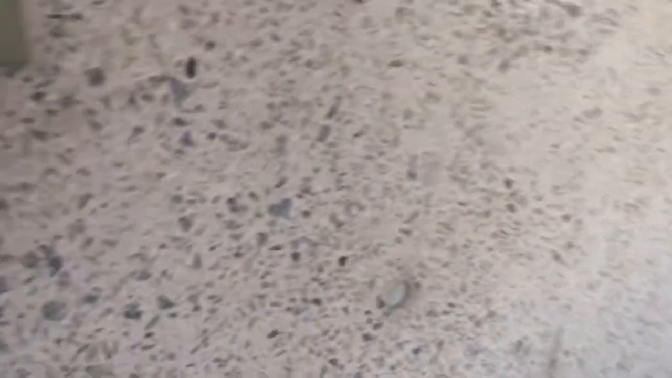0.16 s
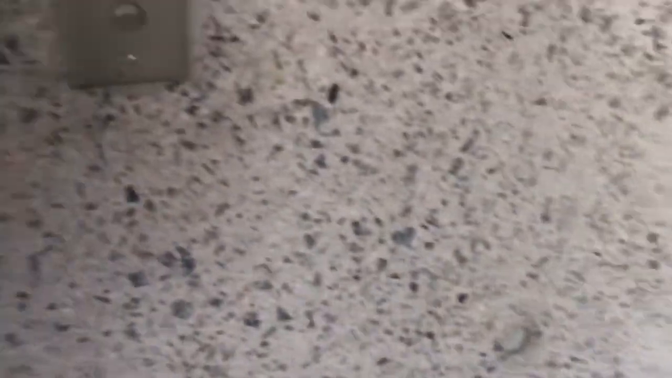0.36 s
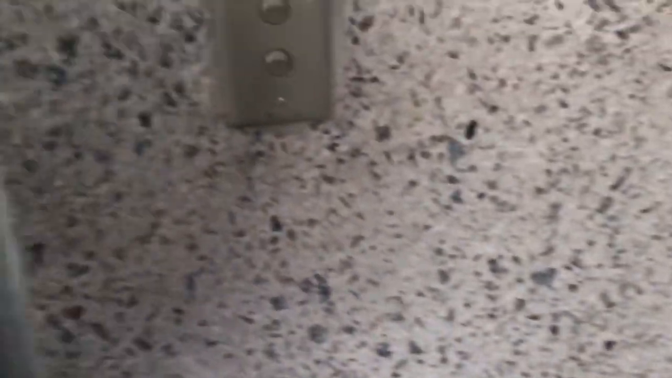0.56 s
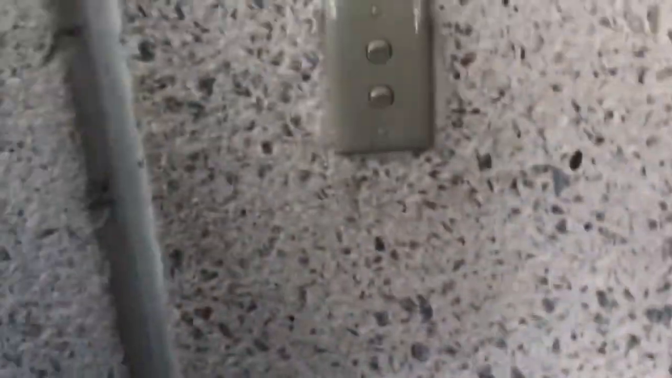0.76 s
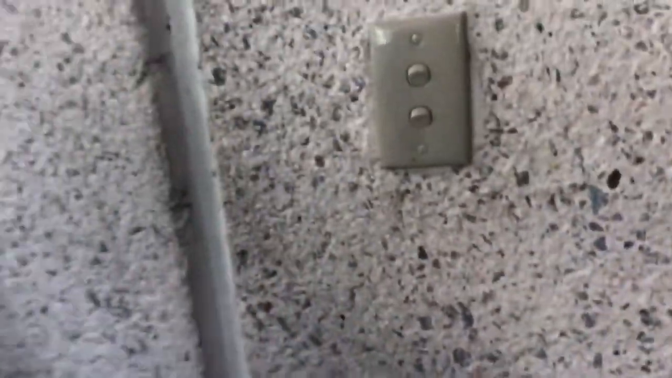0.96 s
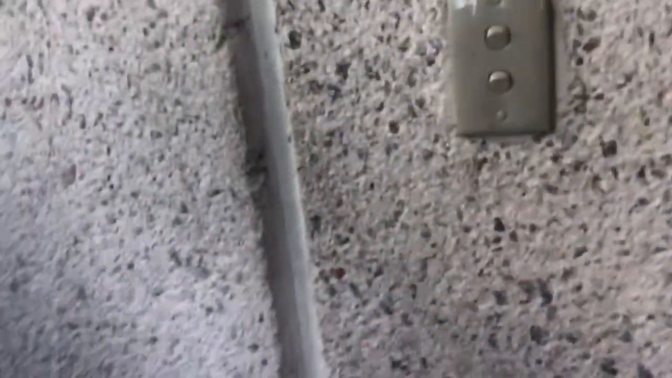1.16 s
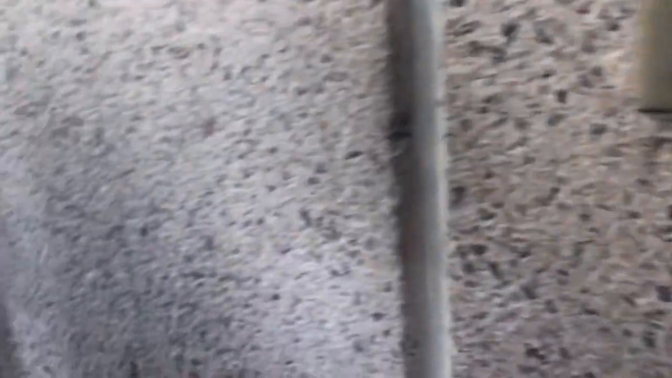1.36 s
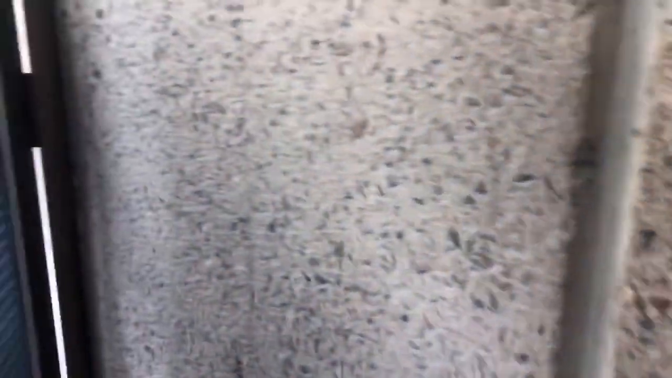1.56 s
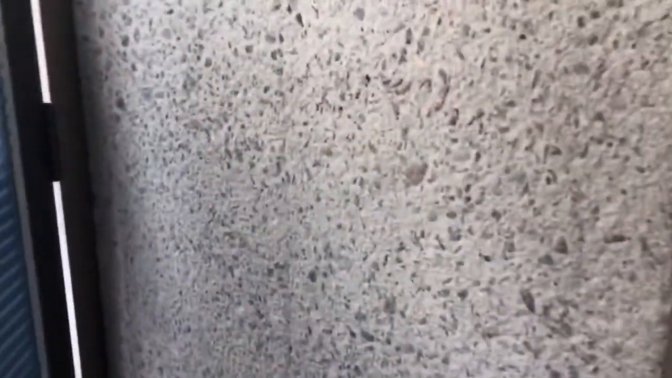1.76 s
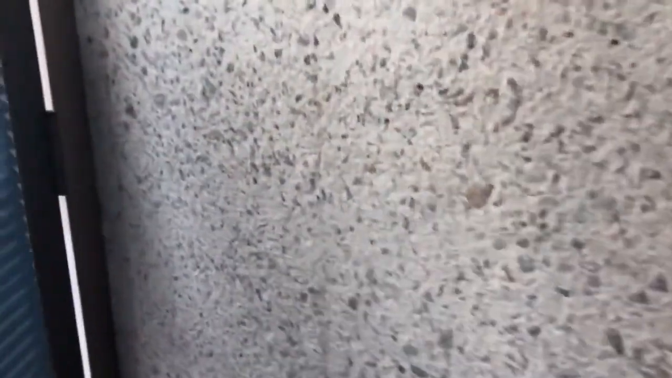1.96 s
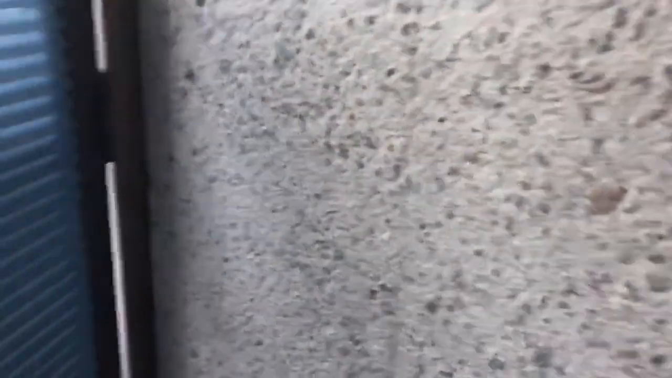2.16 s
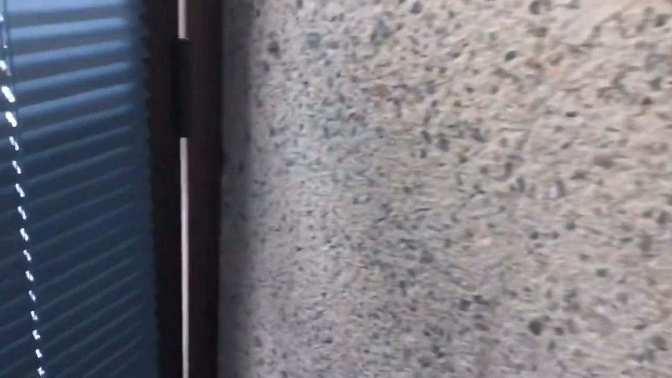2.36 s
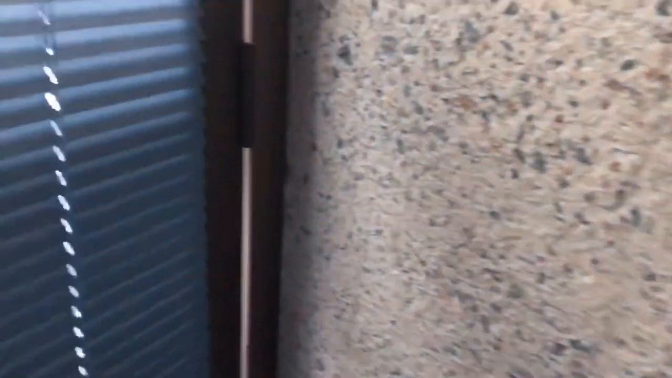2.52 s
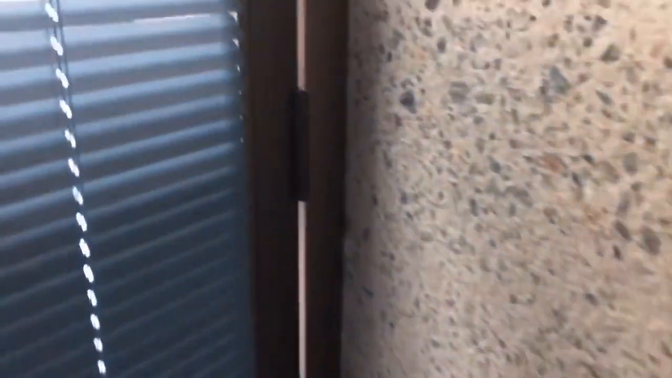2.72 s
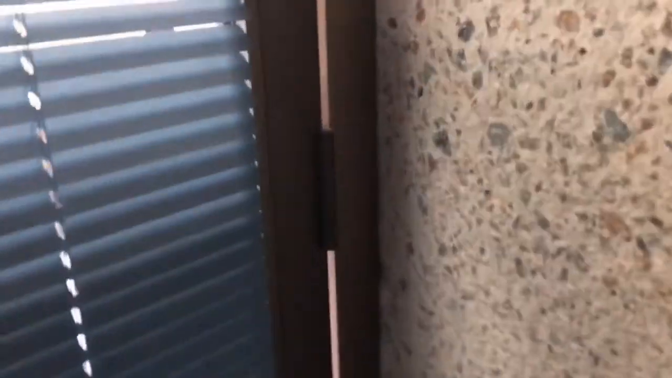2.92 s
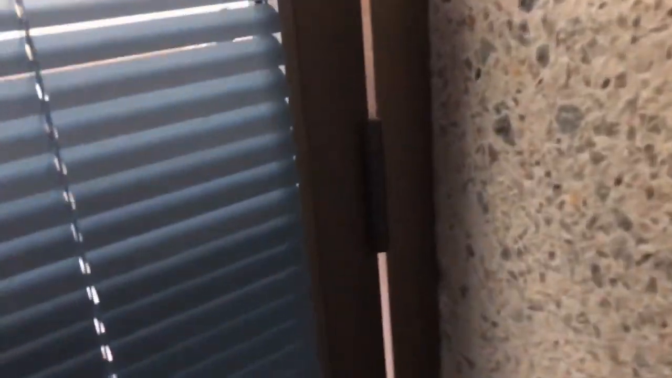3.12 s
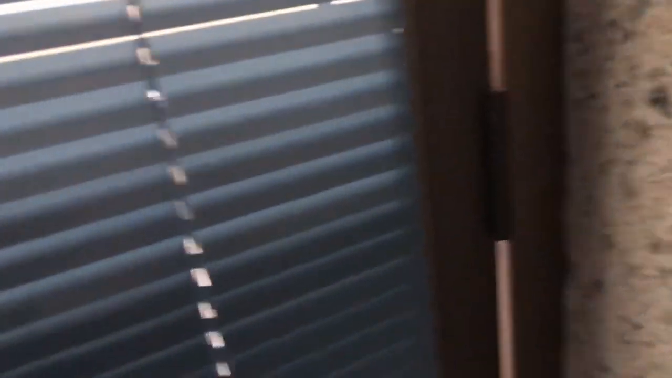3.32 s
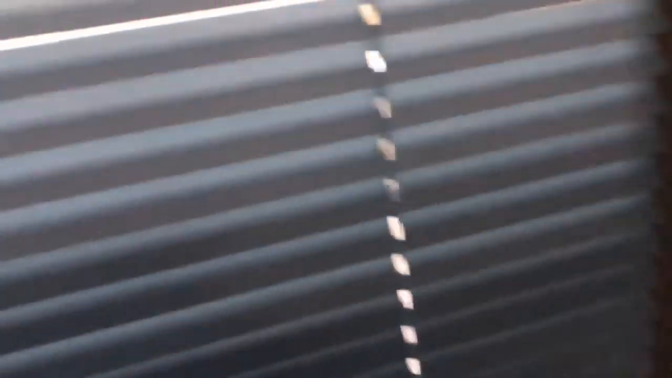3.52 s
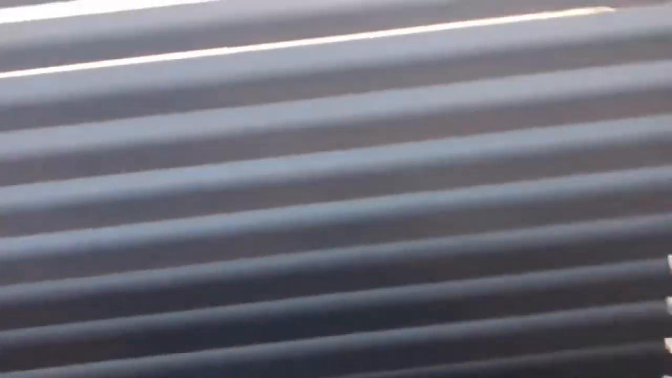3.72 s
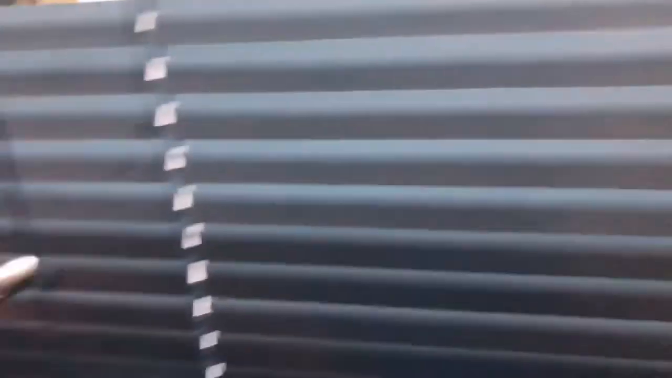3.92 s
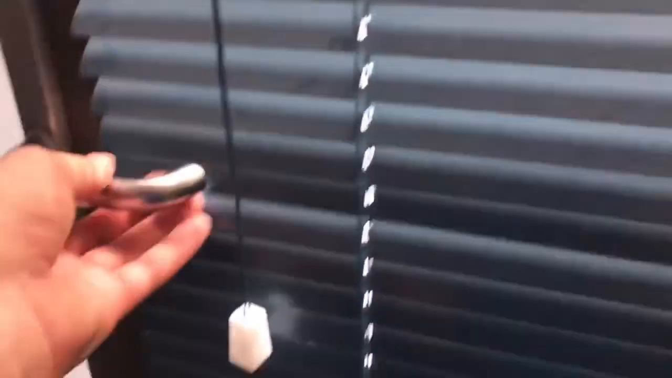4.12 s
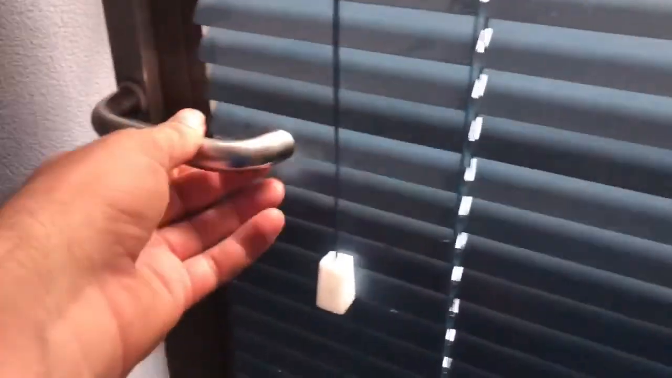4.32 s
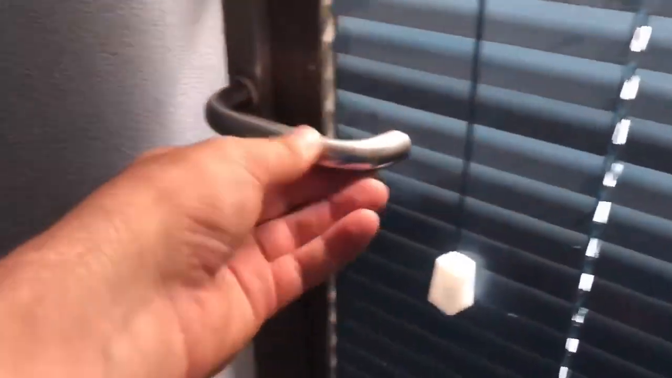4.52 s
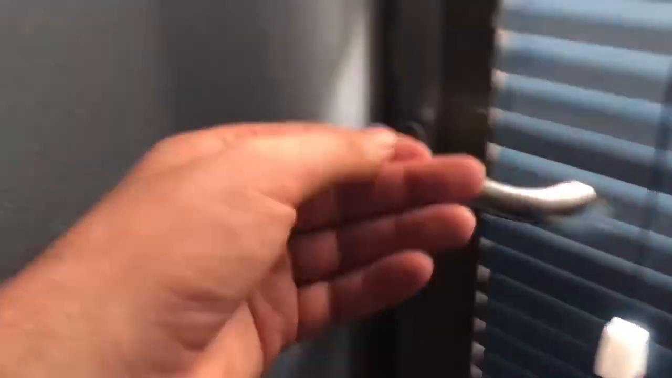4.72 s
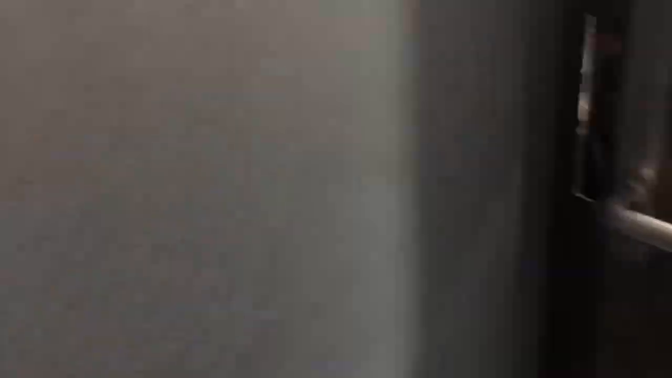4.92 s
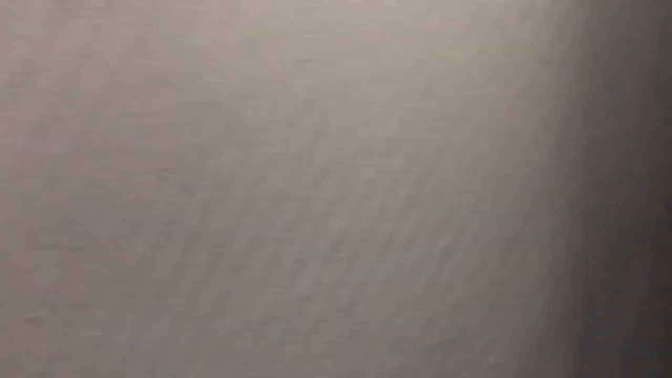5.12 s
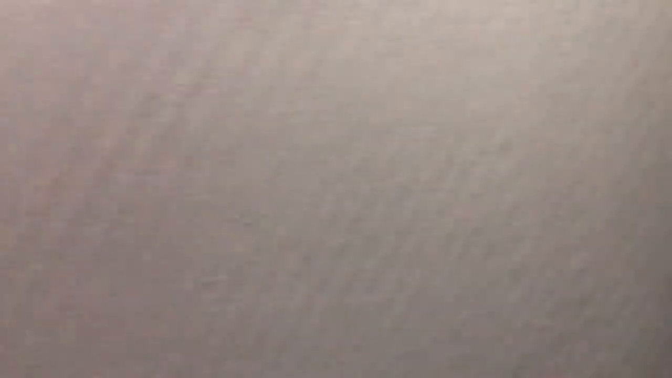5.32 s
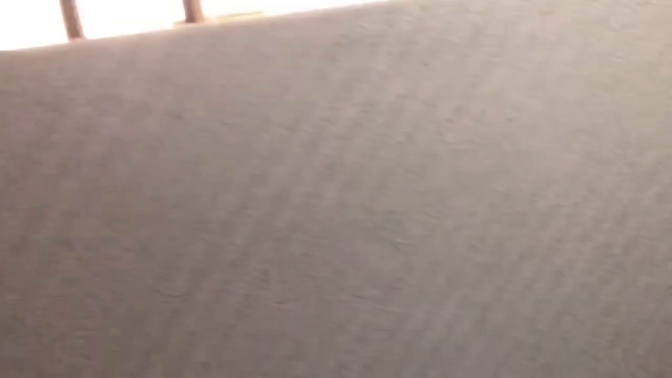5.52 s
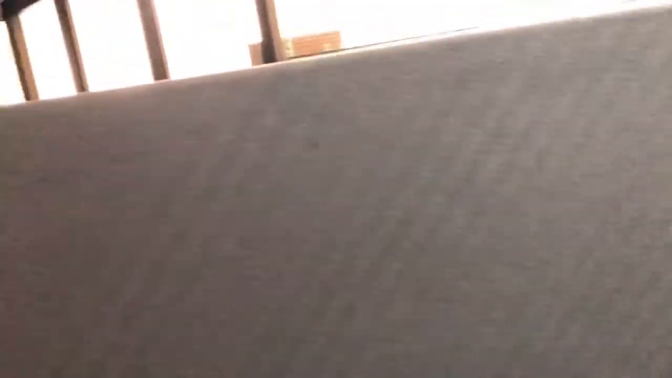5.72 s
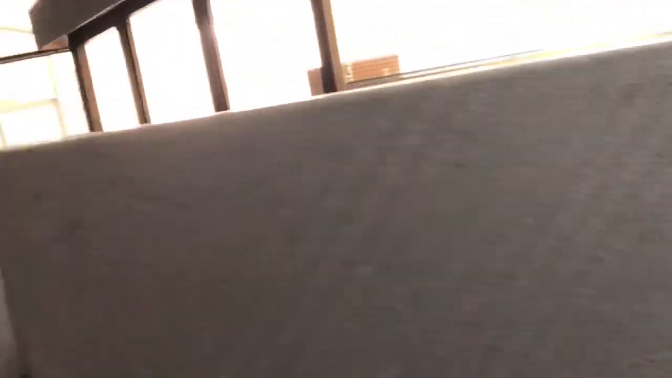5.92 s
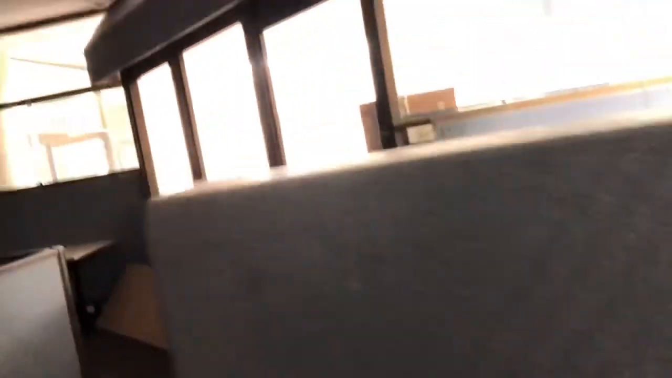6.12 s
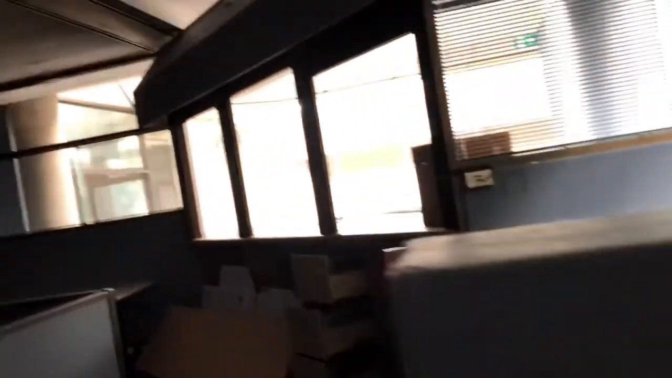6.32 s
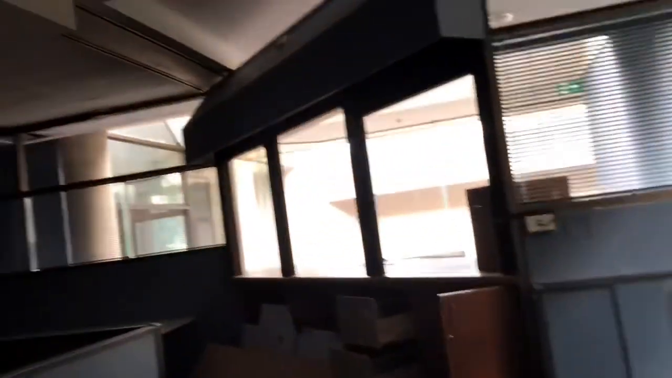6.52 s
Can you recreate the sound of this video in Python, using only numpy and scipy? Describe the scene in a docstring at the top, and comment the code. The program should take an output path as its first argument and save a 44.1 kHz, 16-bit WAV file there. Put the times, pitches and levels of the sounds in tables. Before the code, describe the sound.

A quiet, bare hall with soft duct rumble, thin hiss and a faint low hum, heard close by a moving handheld microphone. From 0.1 to 0.7 s come small dull ticks, faint spring murmurs and shoe scuffs. At 1.05 s a crisp latch click starts a run of clicks and gritty scrapes with high zings until 1.5 s; another bright click at 1.7 s. Around 2.1 s the lever knocks lightly with a scuff, tiny high ting and thin ringing, again at 2.4 s. A near lull follows. Sharp clicks at 3.4 and 3.7 s, then a loud, short metallic clack at 4.26 s. Soft bumps at 4.65 s and a click at 4.88 s precede a dense, loud rattling door thump at 5.0-5.13 s with scrape and low boom, and a lesser knock at 5.27 s. A small ping at 5.45 s, then faint ticks and rustle to 6.6 s.

```python
"""A steel lever handle on a glazed door is worked by hand in an empty concrete building.
Blows of latch, lever and door are bursts of filtered noise; struck parts ring on as sums of damped sines.
The return spring scrapes and zings by uneven slipping friction; shoes and clothes rub as shaped noise.
A ventilation duct rumbles and hums, and the bare walls reverberate by convolution with decaying noise."""
import sys
import numpy as np
from scipy import signal
from scipy.fft import rfft, irfft, next_fast_len
from scipy.io import wavfile

SR = 44100
rng = np.random.default_rng(int(sys.argv[2]) if len(sys.argv) > 2 else 0)


def store_pcm(level_fs):
    """Save levels as 16-bit WAV."""
    pcm = np.round(np.clip(level_fs, -1, 1) * 32767).astype(np.int16)
    wavfile.write(sys.argv[1], SR, np.atleast_2d(pcm).T)


N = 294279
TIME = np.arange(N) / SR
AGE = TIME[:SR]  # seconds since the onset of one sound

# Rumble of the duct. Each row: time in seconds, level in dB.
DUCT_LEVEL = [(0, -58), (1.2, -57.5), (1.7, -56.5), (2.7, -56.5), (4.3, -56.5), (6.67, -61.5)]
# Spectrum of the moving air. Each row: frequency in Hz, relative gain in dB.
AIR_SPECTRUM = [(15, -35), (25, -12), (64, -0.5), (107, -3.5), (152, -9), (200, -7), (248, -7),
                (299, -10.5), (449, -8), (672, -11.5), (905, -8), (1150, -7), (2730, -1), (4100, 6.5),
                (15800, 3.5)]
# Standing waves of a fan, each loudest as the microphone crosses its crest.
# Each row: frequency in Hz, level at the crest in dB, time of the crest in seconds, fall in dB per second.
FAN_TONES = [(152.6, -57, 3.6, 5), (256, -64.5, 7.13, 5)]

# Rustle of moving clothes. Each row: time in seconds, level in dB before flutter and ticks.
RUSTLE_LEVEL = [(0, -74), (0.58, -74), (0.72, -64), (0.95, -66), (1.2, -61), (1.6, -64), (1.7, -67),
                (1.85, -57), (2.3, -64), (2.85, -64), (3.3, -70), (3.75, -60), (4.1, -70), (4.55, -70),
                (4.95, -59), (5.7, -78), (6.0, -75), (6.17, -68), (6.37, -78), (6.67, -70)]
# Spectrum of rubbed cloth. Each row: frequency in Hz, relative gain in dB.
CLOTH_SPECTRUM = [(150, -9.5), (600, -2), (1300, 2), (4800, -1), (8000, -4), (16000, -15)]

# Soles scuff the floor; the row at 3.68 s is a brief scrape leading into the click after it. # Each row: start
# in seconds, length in seconds before a common stretch, level in dB, centre in Hz.
SCUFFS = [(0.094, 0.012, -47, 1540), (0.375, 0.011, -42.5, 536), (0.43, 0.0091, -46.5, 426),
          (0.685, 0.018, -55.5, 840), (1.0, 0.076, -53.5, 1190), (1.058, 0.063, -49.5, 570),
          (1.28, 0.015, -48.5, 740), (1.79, 0.06, -51.5, 1310), (1.879, 0.0071, -42, 1040),
          (2.081, 0.019, -36, 1190), (2.378, 0.0073, -39, 1050), (3.406, 0.0055, -49, 614),
          (3.68, 0.012, -52, 1900), (6.421, 0.044, -54.5, 1860)]
# Rubber grips and squeaks.
# Each row: start in seconds, length in seconds before a common stretch, level in dB, pitch in Hz.
SQUEAKS = [(0.225, 0.023, -45, 1810), (0.903, 0.013, -54.5, 1020), (1.912, 0.0083, -39, 2620),
           (2.185, 0.034, -44.5, 770), (4.456, 0.0099, -46.5, 640)]

# The spring drags over its seat. Each row: start in seconds, length in seconds, rise in seconds,
# final zing pitch in Hz, zing level in dB, scrape level in dB, level of the spring's note in dB.
SPRING_DRAGS = [(0.11, 0.1, 0.012, 11300, -80, -75, -53), (0.182, 0.11, 0.0035, 11100, -64, -54, -46),
                (0.295, 0.036, .01, 11300, -80, -77, -50.5),
                (1.126, 0.076, 0.011, 11650, -42.5, -47.5, -57), (1.23, 0.02, .006, 10900, -51, -73, -60),
                (1.3, 0.11, 0.0093, 11060, -48.5, -54, -57),
                (1.421, 0.06, 0.0016, 10730, -41.5, -43.5, -48.5),
                (1.512, 0.033, 0.0011, 10700, -54, -57, -53.5),
                (2.165, 0.053, 0.0082, 11300, -60, -44.5, -62),
                (2.396, 0.066, 0.02, 11000, -49, -45.5, -47), (2.525, 0.039, 0.007, 10800, -61, -83, -75),
                (2.697, 0.057, .006, 10800, -56, -68, -72), (2.77, 0.042, 0.0073, 10100, -58.5, -77, -74),
                (3.809, 0.054, 0.0026, 11200, -57.5, -64, -70), (3.875, 0.026, 0.0044, 9450, -44, -51, -47),
                (4.32, 0.06, .004, 11500, -53, -45, -50.5), (4.576, 0.099, .0003, 11400, -44, -48.5, -61),
                (5.134, 0.082, 0.0027, 11070, -39.5, -40, -62),
                (5.318, 0.027, 0.0076, 10300, -53, -49, -47),
                (5.443, 0.035, 0.0018, 11000, -53, -48.5, -52.5)]
# Fizz of the coil. Each row: frequency in Hz, relative gain in dB.
FIZZ_SPECTRUM = [(5000, -36), (9500, -4), (13000, -1), (16000, 5)]
# Spectrum of metal scraping on metal. Each row: frequency in Hz, relative gain in dB.
SCRAPE_SPECTRUM = [(200, -4.5), (900, -7.5), (1600, 1), (2700, -2.5), (4200, 1), (8000, -4.5),
                   (16000, -16.5)]

# Dry contacts of latch and lock. Each row: start in seconds, nominal peak in dB, nominal knock in dB,
# treble in dB, resonance of the struck spot in Hz, rise in seconds.
LATCH_CLICKS = [(0.168, -52, -66, -65, 2100, .0002), (0.186, -38, -55, -69, 1910, 0.0012),
                (0.3732, -41.5, -51, -57, 1300, 0.000091), (0.4452, -48, -60, -68, 3800, 0.00024),
                (0.498, -53, -79, -57, 5000, 0.00046), (0.6251, -44.5, -79, -70, 2200, 0.00011),
                (0.711, -66, -77, -59, 4950, .0005), (1.049, -27.5, -49, -35.5, 2500, 0.00011),
                (1.1227, -35, -53.5, -53, 1680, .0005), (1.2989, -47, -50.5, -55, 1150, .0003),
                (1.331, -48.5, -56, -55, 3300, .0002), (1.4235, -36, -63, -39.5, 3460, .0002),
                (1.514, -49, -64, -58, 5200, .0002), (1.711, -30.5, -50, -30, 4700, 0.000092),
                (1.7205, -38, -59, -54, 4400, .0002), (1.8803, -50, -55, -72, 1300, .0002),
                (1.913, -37, -59, -60, 2620, .0003), (2.054, -34, -53, -50, 2700, 0.00064),
                (2.119, -42, -49, -48, 1500, .0002), (2.195, -37, -47, -48, 2900, .0005),
                (2.3806, -44, -54, -56, 1700, .0003), (3.4039, -26.5, -41, -35.5, 4730, 0.000041),
                (3.483, -50, -80, -53, 2200, .001), (3.6954, -22, -48, -35, 2560, .0001),
                (3.812, -56, -77, -53, 5000, .0005), (3.8842, -40, -78, -43.5, 5170, .002),
                (4.578, -49, -76, -45, 4200, .0002), (4.8847, -23.5, -42, -32, 3300, 0.0013),
                (5.444, -44, -53, -47, 4080, 0.00053), (6.1, -52, -66, -71, 4750, .0002),
                (6.16, -51, -70, -69, 3980, .002), (6.424, -48, -64, -75, 3500, .001),
                (6.459, -54, -63, -61, 2200, .002), (6.542, -56, -68, -61, 5500, .002)]
# Resonant colour of the lock case. Each row: frequency in Hz, relative gain in dB.
CASE_SPECTRUM = [(40, -24), (150, 8.5), (300, -1), (430, 6), (620, 9), (950, 3), (2000, 4), (3000, 2),
                 (6000, 2.5), (9000, -5), (12000, -5.5), (16000, -9.5)]

# Dull thuds, of the door and of a footfall, each in one resonance. # Each row: start in seconds, nominal level
# in dB, frequency in Hz, t60 in seconds.
DULL_THUDS = [(1.122, -39.5, 617, .09), (1.252, -40, 760, 0.07), (1.308, -39, 677, .08),
              (1.392, -45, 488, 0.073), (1.486, -39.5, 518, 0.064), (1.682, -38, 156, .07),
              (2.089, -35, 234, 0.11), (2.211, -40, 790, .08), (4.647, -29, 179.6, 0.22),
              (4.654, -34, 573, 0.16), (4.843, -36.5, 180, 0.23), (4.887, -40, 546, 0.12),
              (5.009, -21, 650, .045), (5.014, -25, 428, .05), (5.02, -31, 173, .1),
              (5.056, -27, 553, .07), (5.288, -38.5, 166.2, 0.33), (5.425, -46, 160.6, 0.36)]

# A loose washer tings. Each row: start in seconds, level in dB.
WASHER_TINGS = [(2.056, -51), (2.08, -43.5)]
# Modes of the washer. Each row: frequency in Hz, relative level in dB, t60 in seconds.
WASHER_MODES = [(8500, -9, .12), (11560, -0.5, 0.21), (11690, -9, .14)]

# The lever hits its stop. Each row: start in seconds, nominal peak in dB, nominal knock in dB, treble in dB,
# t60 in seconds, rise in seconds, ring in dB, hum of the bar in dB, grip of the hand from 0 to 3.
LEVER_BLOWS = [(2.076, -32, -46.5, -42, 0.19, 0.0035, -47, -41.5, 1.4),
               (2.419, -30.5, -56, -53, 0.085, .0003, -46, -50.5, 1.1),
               (4.256, -11.5, -31.5, -20, 0.041, 0.00014, -29.5, -36, 0.02)]
# Modes of the lever. Each row: frequency in Hz, relative level in dB, t60 in seconds without a grip.
LEVER_MODES = [(1530, -19, .4), (2576, -13, .24), (2640, -4, .38), (3745, -10, .2), (3782, -7, .18),
               (5258, -7, .38), (6837, -13, .22), (7589, -2, .18), (8480, -6.5, .29), (8557, -7.5, .29),
               (10215, -5, .23), (11510, -10, .18), (12130, -9, .27), (14230, -13, .2), (15690, -8, .16)]

# The door knocks in its frame. Each row: start in seconds, nominal peak in dB, nominal knock in dB,
# ring of the leaf in dB, treble in dB, resonance of the struck spot in Hz, rise in seconds.
DOOR_KNOCKS = [(2.087, -32, -52, -43.5, -48, 2100, 0.0012), (4.654, -34, -44, -41, -39, 1500, 0.0018),
               (4.673, -27, -40, -41.5, -29.5, 3100, 0.0019), (4.9943, -22, -34.5, -26, -33, 1900, 0.00085),
               (5.0071, -12, -25, -19.5, -19.5, 5500, 0.00056), (5.0161, -33, -32, -27, -37, 1900, .0005),
               (5.0264, -17, -47, -47, -34, 1600, 0.00059), (5.056, -43, -36, -36, -52, 1300, .001),
               (5.0635, -20.5, -35, -53, -25.5, 1800, 0.0015),
               (5.1207, -16, -28.5, -35, -27, 3000, 0.00054),
               (5.128, -23.5, -30.5, -30, -37, 1900, 0.00073),
               (5.2718, -25, -39.5, -34, -38, 4230, 0.00046), (5.281, -39, -36.5, -37.5, -51, 2100, .001)]
# Modes of the door leaf. Each row: frequency in Hz, relative level in dB for a hard knock, t60 in seconds.
LEAF_MODES = [(104, -20, .3), (163, -11, 0.22), (235, -13, .2), (283, -10, 0.15), (328, -11, .13),
              (394, 1, 0.085), (432, 2, 0.06), (460, -6, .08), (566, -2.5, 0.055), (637, -3.5, 0.045),
              (705, -4, .035), (844, -16, 0.1), (1073, -14, .14), (1515, -12, .11), (1848, -10, 0.11),
              (1964, -14, .16)]
# Slow flexing of the glazed door. Each row: frequency in Hz, relative level in dB, t60 in seconds.
PANE_MODES = [(38, -2, 0.56), (55.8, 0, 1.0)]
# Rumble of the swaying door. Each row: frequency in Hz, relative gain in dB.
SWAY_SPECTRUM = [(22, -24), (36, 5), (55, -2), (80, 0.5), (150, -9), (230, -18), (600, -53)]

# Modes of the latch bolt. Each row: frequency in Hz, relative level in dB, t60 in seconds.
BOLT_MODES = [(3537, -3, 0.15), (4020, -4, 0.05)]
# Reverberation of the hall. Each row: frequency in Hz, t60 in seconds.
HALL_T60 = [(60, 0.75), (200, 0.77), (1000, 0.53), (3500, 0.42), (8000, 0.22), (16000, 0.15)]

# clothes: rate of faint ticks, their level over the rustle, its spread, their decay
TICKS_PER_S, TICK_DB, TICK_SPREAD_DB, TICK_T60_S = 2.5, 7, 2.5, 0.015
# shoes: width of the resonance that each kind of rub excites, and the stretch of all lengths
SCUFF_OCTAVES, SQUEAK_OCTAVES, RUB_STRETCH = 1, 0.34, 1.89
# uneven pressure on the coil: wander of the zing in pitch and in level
ZING_WANDER_HZ, PRESSURE_DB = 250, 1.7
# the spring's note, its ring once the rub lets go, and its unsteadiness in pitch and level
NOTE_HZ, NOTE_T60_S, NOTE_WANDER_HZ, NOTE_FLUTTER_DB = 1525, 0.1, 26, 3.5
OVERTONE_HZ, OVERTONE_DB = 3850, -16  # the note's faint upper partial
# tiny slips within a scrape: rate, height, decay
SLIPS_PER_S, SLIP_DB, SLIP_T60_S = 90, 1, .009
# parts slide before they strike: how long, level relative to the blow's nominal peak
SLIDE_S, SLIDE_DB = 0.011, -30.5
# ring of a firm click and its peak; a click this much harder dies twice as fast
CLICK_T60_S, FIRM_DB, HALVING_DB = 0.058, -23.5, 63
SPOT_DB, SPOT_OCTAVES = 10.5, 0.24  # height for a click, and width, of the struck spot's resonance
RISE_CYCLES = 0.62  # time constant of a mode's build-up, in its own cycles
BUMP_RISE_S = 0.0046  # time constant of a thud's swell
PING_S, PING_DB = 5.445, -46  # the bolt springs home
STOP_SPOT_HZ, STOP_SPOT_DB = 3970, 4.5  # resonance of the lever's stop
# the bar's longest mode: pitch, split of its twin, the twin's level, decay
BAR_HZ, SPLIT_HZ, TWIN_DB, BAR_T60_S = 3845, 9.3, -6, .72
THUMP_T60_S, LEAF_LAG_S = 0.048, 0.00199  # decay of the bolt's knock; the leaf follows it
BOOM_DB, BOOM_RISE_S = -12, 0.043  # sway of the leaf relative to its ring, and its build-up
RUMBLE_DB, RUMBLE_T60_S = 1, 1  # loose rumble within the sway, and its decay
# a hard knock's ring; dB per octave lost for each dB softer, around the pivot
HARD_DB, SOFT_TILT, PIVOT_HZ = -20, 0.16, 390
# share of each source sent into the hall
LATCH_HALL_DB, LEVER_HALL_DB, DOOR_HALL_DB, RUB_HALL_DB = -11.5, -13.5, -12, -9.5
TOP_HZ = 15900  # upper band limit


def amp(db):
    """Level: decibels to an amplitude ratio."""
    return 10 ** (np.asarray(db) / 20)


def unit(x):
    """Normalisation: scale a signal to rms 1."""
    return x / np.sqrt(np.mean(x ** 2) + 1e-20)


def along(points, hz):
    """Spectral envelope: (Hz, value) points interpolated on a logarithmic frequency axis."""
    f, v = np.transpose(points)
    return np.interp(np.log(hz + 1), np.log(f + 1), v)


def curves(rows):
    """Time envelope: one value per sample for each column after the time."""
    s, *cols = np.transpose(rows)
    return [np.interp(TIME, s, c) for c in cols]


def noise(gain, size=SR):
    """Filtered noise: a random signal of rms 1, coloured by a gain that depends on frequency."""
    spectrum = rfft(rng.standard_normal(size))
    return unit(irfft(spectrum * gain(np.fft.rfftfreq(size, 1 / SR)), size))


def fade(t60):
    """Exponential damping: the level falls 60 dB in t60 seconds; the curve spans one second."""
    return np.exp(-np.log(1000) * AGE / max(t60, .001))


def stroke(length, rise, release):
    """Friction envelope: a rub swells, holds for its length and lets go."""
    return (1 - np.exp(-AGE / rise)) / (1 + (AGE / length) ** release)


def ring(modes, scatter_db, waver_db, waver_hz):
    """Modal synthesis: damped sines, the low ones slower to start, each wavering in level on its own."""
    out = np.zeros(SR)
    for hz, db, t60 in modes:
        waver = np.interp(AGE * waver_hz, np.arange(100), rng.standard_normal(100))
        swell = fade(t60) * (1 - np.exp(-AGE * hz / RISE_CYCLES))
        level = amp(db + scatter_db * rng.normal() + waver_db * waver)
        out += level * swell * np.sin(2 * np.pi * (hz * AGE + rng.random()))
    return out


def add(track, s, sound):
    """Superposition: mix a sound into a track from a time in seconds."""
    part = track[max(round(s * SR), 0):][:len(sound)]
    part += sound[:len(part)]


def ribs(hz, depth_db, spacing_hz):
    """Modal density: the many narrow resonances of small metal parts, new at each contact point."""
    knots = rng.standard_normal(1000)
    return amp(depth_db * np.interp(hz / spacing_hz, np.arange(len(knots)), knots))


def ventilation(hiss_db=-72.0):
    """Flow noise and tones: duct rumble, a thin steady hiss and two slightly unsteady fan tones."""
    rumble_db, = curves(DUCT_LEVEL)
    rumble = noise(lambda hz: amp(along(AIR_SPECTRUM, hz)) / (1 + (hz / 700) ** 2), size=N)
    hiss = noise(lambda hz: amp(along(AIR_SPECTRUM, hz)) * hz / (hz + 700), size=N)
    out = amp(rumble_db) * rumble + amp(hiss_db) * hiss
    for hz, db, crest_s, fall in FAN_TONES:
        waver_db = 2.0 * noise(lambda f: f < 5, size=N)
        level = amp(db - fall * np.abs(TIME - crest_s) + waver_db)
        out += level * np.sqrt(2) * np.sin(2 * np.pi * hz * TIME)
    return out


def clothes(count=40):
    """Fibre friction: moving cloth rustles unevenly and ticks now and then, both louder with more movement."""
    rustle_db, = curves(RUSTLE_LEVEL)
    ticks = np.zeros(N)
    starts = np.cumsum(rng.exponential(size=count)) / TICKS_PER_S
    for s, size in zip(starts, rng.standard_normal(count)):
        add(ticks, s, amp(TICK_DB + TICK_SPREAD_DB * size) * fade(TICK_T60_S))
    flutter = amp(4.2 * noise(lambda hz: hz < 14, size=N))
    return amp(rustle_db) * (flutter + ticks) * noise(lambda hz: amp(along(CLOTH_SPECTRUM, hz)), size=N)


def grit(depth_db, rate_hz, catch_db, catches_per_s=45):
    """Uneven friction: a quick flutter of level, and sparse catches that tick."""
    flutter = amp(depth_db * noise(lambda hz: hz < rate_hz))
    snags = (rng.random(SR) < catches_per_s / SR) * amp(catch_db)
    return flutter * (1 + signal.fftconvolve(snags, fade(0.0045))[:SR])


def shoes():
    """Friction-driven resonance: uneven rubs around one centre, broad for a scuff, narrow for a squeak."""
    out = np.zeros(N)
    for rows, octaves in (SCUFFS, SCUFF_OCTAVES), (SQUEAKS, SQUEAK_OCTAVES):
        for s, length, db, centre_hz in rows:
            rub = noise(lambda hz: 1 / (1 + (np.log2((hz + 1) / centre_hz) / octaves) ** 2) ** 1.31)
            gritty = unit(rub * grit(depth_db=0.5, rate_hz=370, catch_db=0))
            add(out, s, amp(db) * gritty * stroke(RUB_STRETCH * length, rise=0.0015, release=4.2))
    return out


def zing(end_hz, sag_hz=1300, glide_s=0.035, width_hz=950, slip_hz=150, fizz_db=-8):
    """Stick-slip: uneven slips excite a high resonance that sinks as the coil relaxes, in a wider fizz."""
    centre_hz = end_hz + sag_hz * np.exp(-AGE / glide_s) + ZING_WANDER_HZ * noise(lambda hz: hz < 35)
    # slow noise times a gliding sine makes a band around the centre
    slow = noise(lambda hz: np.exp(-.5 * (hz / width_hz) ** 2))
    band = unit(slow * np.sin(2 * np.pi * np.cumsum(centre_hz) / SR))
    fizz = noise(lambda hz: amp(along(FIZZ_SPECTRUM, hz)) * ribs(hz, depth_db=-3.0, spacing_hz=251))
    slips = np.cumsum(slip_hz * (1 + 0.4 * noise(lambda hz: hz < 60))) / SR
    pressure = amp(PRESSURE_DB * noise(lambda hz: hz < 45))
    catching = (1 + .35 * np.cos(2 * np.pi * slips)) * pressure
    return unit((band + amp(fizz_db) * fizz) * catching)


def slipping():
    """Intermittent slip: a rub moves in many small slips of uneven size, each a brief spike of level."""
    slips = (rng.random(SR) < SLIPS_PER_S / SR) * rng.uniform(.5, 1, SR)
    return 1 + amp(SLIP_DB) * signal.fftconvolve(slips, fade(SLIP_T60_S))[:SR]


def spring_note(rub):
    """Driven resonance: the rub pumps the spring's narrow note, which flutters and rings on after it."""
    tail = fade(NOTE_T60_S)
    swell = signal.fftconvolve(rub, tail / tail.sum())[:SR]
    cycles = np.cumsum(NOTE_HZ + NOTE_WANDER_HZ * noise(lambda hz: hz < 50)) / SR
    overtone = np.sin(2 * np.pi * cycles * OVERTONE_HZ / NOTE_HZ)
    tone = np.sin(2 * np.pi * cycles) + amp(OVERTONE_DB) * overtone
    return swell * unit(tone * amp(NOTE_FLUTTER_DB * noise(lambda hz: hz < 60)))


def spring():
    """Sliding friction: each drag is a gritty scrape with a zing on top and the spring's own note."""
    out = np.zeros(N)
    for s, length, rise, zing_hz, zing_db, scrape_db, note_db in SPRING_DRAGS:
        rough = noise(lambda hz: amp(along(SCRAPE_SPECTRUM, hz)) * ribs(hz, depth_db=4.5, spacing_hz=112))
        scrape = unit(slipping() * rough)
        rub = stroke(length, rise, release=5.3)
        friction = (amp(zing_db) * zing(zing_hz) + amp(scrape_db) * scrape) * rub
        add(out, s, friction + amp(note_db) * spring_note(rub))
    return out


def slides():
    """Pre-contact friction: before every blow the parts slide over each other with growing level."""
    out = np.zeros(N)
    for s, peak_db, *_ in LATCH_CLICKS + LEVER_BLOWS + DOOR_KNOCKS:
        scrape = noise(lambda hz: amp(along(SCRAPE_SPECTRUM, hz)))
        ramp = (AGE / SLIDE_S) * (AGE < SLIDE_S)
        add(out, s - SLIDE_S, amp(peak_db + SLIDE_DB) * scrape * ramp)
    return out


def contact(peak_db, knock_db, treble_db, t60, rise, spot_hz=2000, spot_db=0, crest_db=5.5,
            crack_db=-5, crack_t60=0.0064, rebound_db=-17.0, rebound_s=0.0049):
    """Impact: a sharp crack and a rebound, with the dense, short ringing of the lock case."""
    spot = lambda hz: spot_db / (1 + (np.log2((hz + 1) / spot_hz) / SPOT_OCTAVES) ** 2)
    case = lambda hz: amp(along(CASE_SPECTRUM, hz) + spot(hz))
    colour = lambda hz: case(hz) * ribs(hz, depth_db=3.2, spacing_hz=70)
    knock = noise(lambda hz: amp(along(CASE_SPECTRUM, hz)) / (1 + (hz / 900) ** 6))
    body = noise(lambda hz: colour(hz) * (hz > 900) * (hz < 6500))
    treble = noise(lambda hz: colour(hz) * (hz > 6500))
    blow = (amp(crack_db) * fade(crack_t60) + fade(t60)) * (1 - np.exp(-AGE / rise))
    add(blow, rebound_s * rng.uniform(0.31, 1.6), amp(rebound_db) * fade(1.75 * t60))
    # heavy parts start late and ring longer than the crack
    swing = amp(9.0) * fade(1.38 * t60) * (1 - np.exp(-AGE / 0.0026))
    bright = amp(peak_db - crest_db) * body + amp(treble_db) * treble
    return amp(knock_db) * knock * swing + bright * blow


def latch():
    """Contact damping: loose metal clicks; the harder the parts are pressed together, the sooner they fall still."""
    out = np.zeros(N)
    for s, peak_db, knock_db, treble_db, spot_hz, rise in LATCH_CLICKS:
        t60 = CLICK_T60_S * 2 ** ((FIRM_DB - peak_db) / HALVING_DB)
        add(out, s, contact(peak_db, knock_db, treble_db, t60, rise, spot_hz, SPOT_DB))
    return out


def bumps():
    """Single resonance: each soft thud booms in one damped mode."""
    out = np.zeros(N)
    for s, db, hz, t60 in DULL_THUDS:
        boom = ring([(hz, db, t60)], scatter_db=.5, waver_db=2.5, waver_hz=50)
        add(out, s, boom * (1 - np.exp(-AGE / BUMP_RISE_S)))
    return out


def washer():
    """Free vibration of a small plate: a loose washer on the spindle tings high."""
    out = np.zeros(N)
    for s, db in WASHER_TINGS:
        add(out, s, amp(db) * ring(WASHER_MODES, scatter_db=1, waver_db=2, waver_hz=90))
    return out


def lever():
    """Modal damping: the struck lever rings on; a grip damps short modes and spares the beating hum of the bar."""
    out = np.zeros(N)
    # rose and spindle add a crowd of faint, high partials
    rose = [(hz, -18, .24) for hz in rng.uniform(5000, 14000, size=30)]
    longest = max(t60 for hz, db, t60 in LEVER_MODES)
    # two close pitches beat
    twin = np.sin(2 * np.pi * (BAR_HZ + SPLIT_HZ) * AGE)
    pair = np.sin(2 * np.pi * BAR_HZ * AGE) + amp(TWIN_DB) * twin
    hum = pair * fade(BAR_T60_S) * (1 - np.exp(-AGE / 0.0083))
    for s, *blow, ring_db, hum_db, grip in LEVER_BLOWS:
        held = [(hz, db, t60 * (t60 / longest) ** max(grip, 0)) for hz, db, t60 in LEVER_MODES + rose]
        metal = ring(held, scatter_db=.7, waver_db=1.6, waver_hz=50)
        strike = contact(*blow, STOP_SPOT_HZ, STOP_SPOT_DB)
        add(out, s, strike + amp(ring_db) * metal + amp(hum_db) * hum)
    return out


def door():
    """Plate excitation: bolt knocks on plate, the leaf rings (soft knocks favour low modes) and sways."""
    out = np.zeros(N)
    for s, peak_db, knock_db, leaf_db, treble_db, spot_hz, rise in DOOR_KNOCKS:
        add(out, s, contact(peak_db, knock_db, treble_db, THUMP_T60_S, rise, spot_hz, spot_db=1.5))
        tilt = SOFT_TILT * (leaf_db - HARD_DB)  # dB per octave
        modes = [(hz, db + tilt * np.log2(hz / PIVOT_HZ), t60) for hz, db, t60 in LEAF_MODES]
        leaf = ring(modes, scatter_db=1.2, waver_db=2, waver_hz=50)
        sway = ring(PANE_MODES, scatter_db=.5, waver_db=2, waver_hz=14)
        rumble = noise(lambda hz: amp(along(SWAY_SPECTRUM, hz))) * fade(RUMBLE_T60_S)
        boom = (sway + amp(RUMBLE_DB) * rumble) * (1 - np.exp(-AGE / BOOM_RISE_S))
        add(out, s + LEAF_LAG_S, amp(leaf_db) * (leaf + amp(BOOM_DB) * boom))
    return out


def bolt():
    """Free vibration: the bolt springs home and pings in its own modes."""
    out = np.zeros(N)
    add(out, PING_S, amp(PING_DB) * ring(BOLT_MODES, scatter_db=1, waver_db=2, waver_hz=20))
    return out


def hall(x, size=8192):
    """Reverberation: bare walls answer with a tail whose treble dies first; its pattern changes as the microphone moves."""
    out = np.zeros(N)
    # overlapping windowed pieces, each with a new random tail
    for start in range(0, N, size // 2):
        hz, t, z = signal.stft(rng.standard_normal(SR), SR, nperseg=256)
        decay = np.exp(-np.log(1000) * t / along(HALL_T60, hz)[:, None])
        tail = signal.istft(z * decay, SR, nperseg=256)[1][:SR]
        tail = tail * (1 - np.exp(-AGE / 0.011))
        piece = x[start:start + size]
        windowed = piece * np.hanning(size)[:len(piece)]
        add(out, start / SR, signal.fftconvolve(windowed, tail / np.linalg.norm(tail)))
    return out


def scene():
    """Direct and reverberant fields: the near sources, the hall's answer to them, and the ventilation."""
    sources = [(slides() + latch() + bolt() + washer(), LATCH_HALL_DB),
               (lever(), LEVER_HALL_DB),
               (door() + bumps(), DOOR_HALL_DB),
               (spring() + shoes() + clothes(), RUB_HALL_DB)]
    near = sum(sound for sound, db in sources)
    sent = sum(amp(db) * sound for sound, db in sources)
    return (near + hall(sent) + ventilation())[None]


def record(dry, low_cut_hz=30):
    """Band limitation: the microphone sheds the deepest rumble; nothing is kept above the band limit."""
    size = next_fast_len(N + SR)
    high_pass = signal.butter(N=4, Wn=low_cut_hz, btype="high", fs=SR, output="sos")
    thinned = signal.sosfilt(high_pass, dry)
    return irfft(rfft(thinned, size) * (np.fft.rfftfreq(size, 1 / SR) < TOP_HZ), size)[:, :N]


dry = scene()
out = record(dry)
store_pcm(out)
```